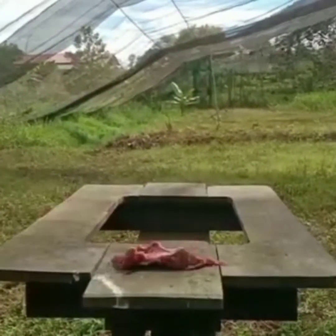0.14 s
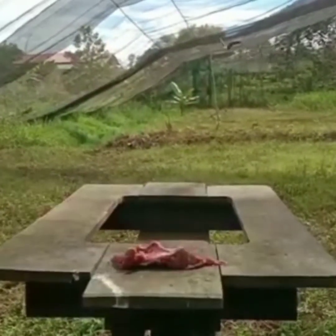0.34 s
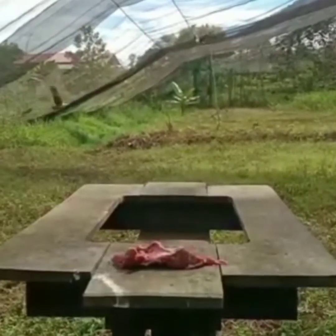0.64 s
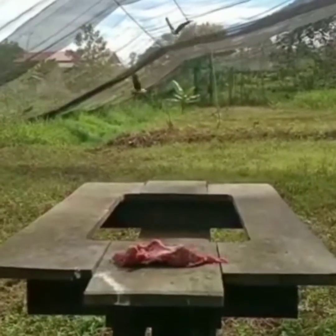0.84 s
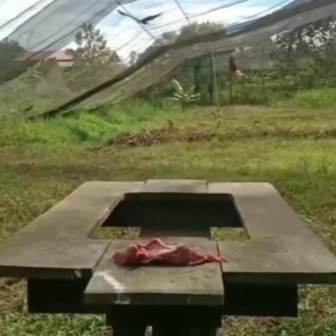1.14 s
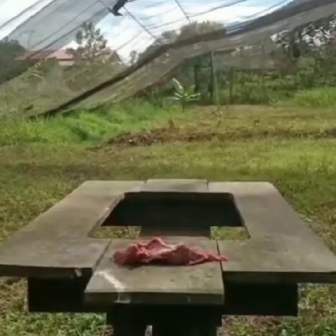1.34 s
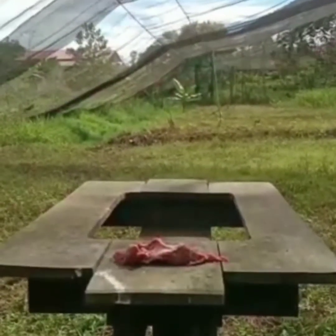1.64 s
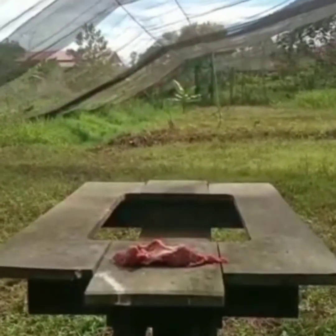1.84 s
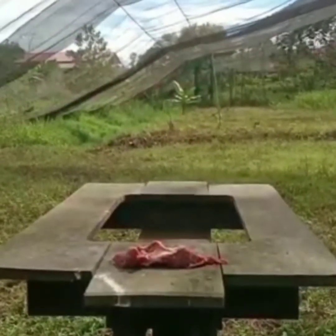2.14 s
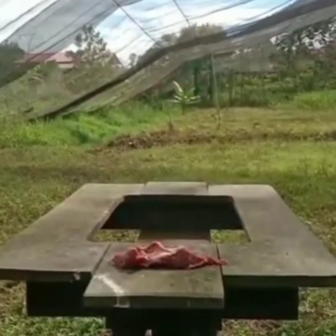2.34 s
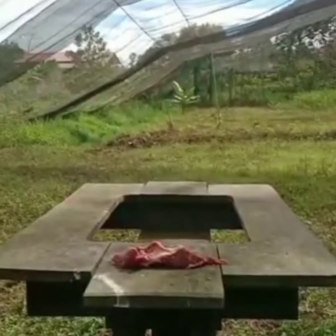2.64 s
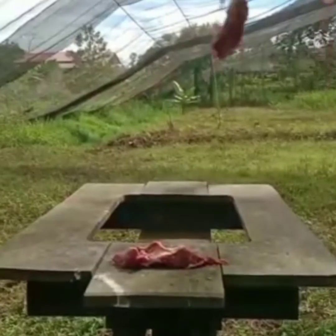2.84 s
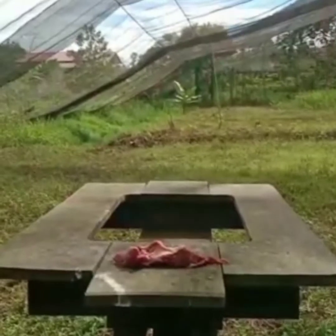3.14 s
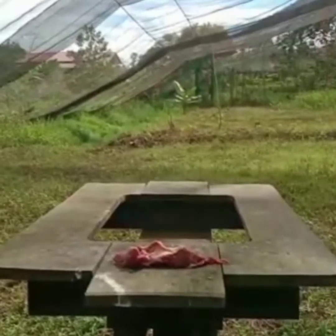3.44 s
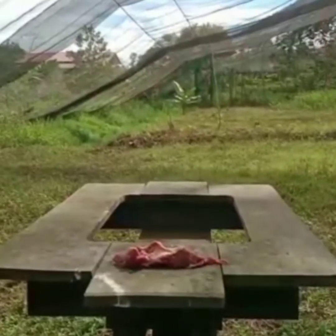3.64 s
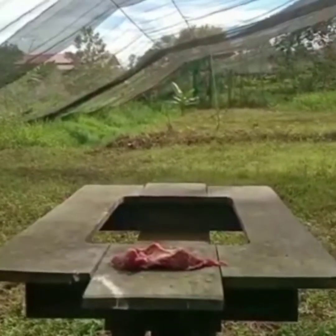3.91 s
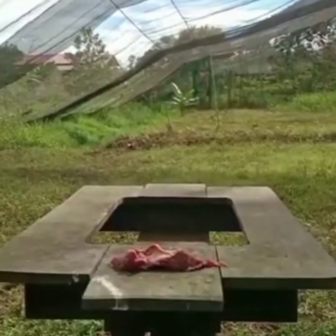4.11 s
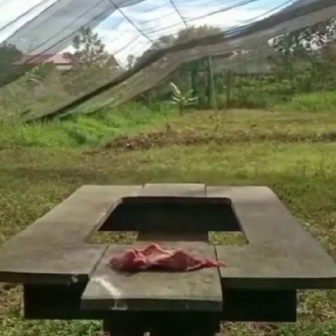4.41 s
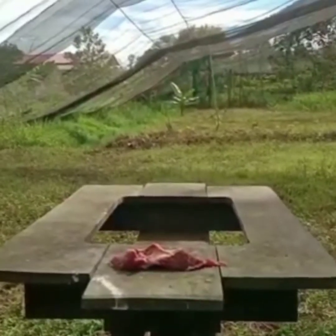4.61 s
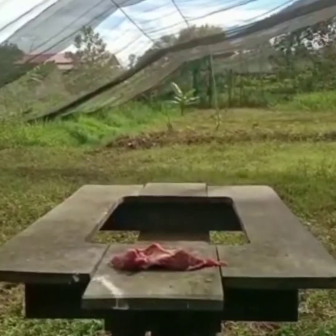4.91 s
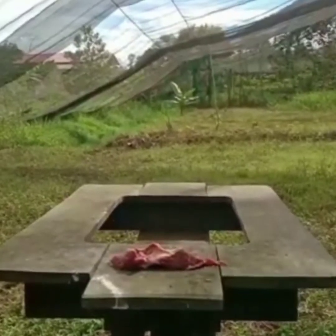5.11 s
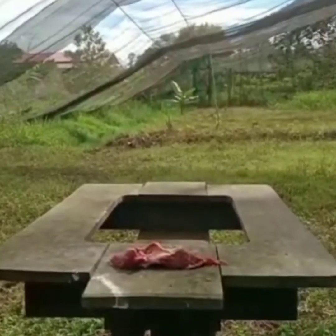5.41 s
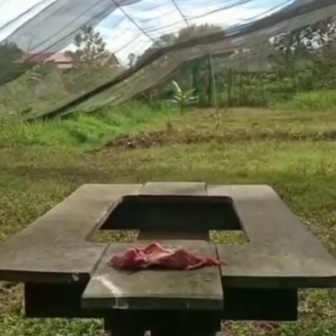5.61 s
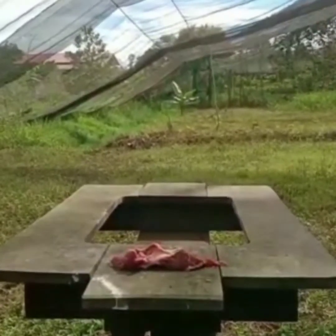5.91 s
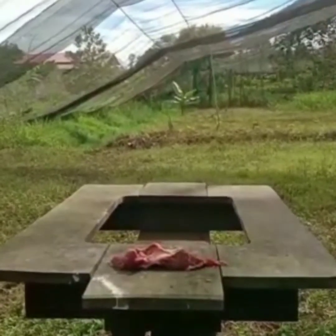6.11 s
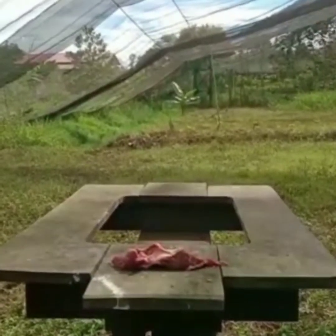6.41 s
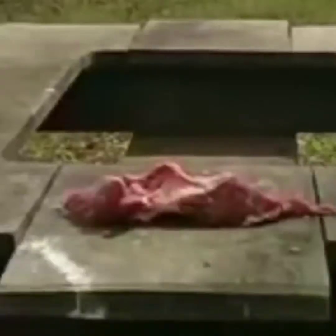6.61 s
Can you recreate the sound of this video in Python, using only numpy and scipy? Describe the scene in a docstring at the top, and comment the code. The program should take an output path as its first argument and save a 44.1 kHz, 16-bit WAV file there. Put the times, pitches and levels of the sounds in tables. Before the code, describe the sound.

Over a low engine-like hum and airy rush, dry rustles and ticks fade away before a bird of prey gives one hoarse, whinnying, descending scream.

```python
"""Hoarse whinny of a bird of prey

A bird of prey in a netted enclosure gives nine quick syllables whose pitch arches and sinks: harmonic pulses
and gated air noise excite resonances, and a decaying noise tail answers. Dry noise rustles and ticks.
An engine hums at multiples of 25 turns a second under a wide rush of coloured noise.
A gain control lowers the whole sound during the scream, ducking the background; near the end the level
drops out and fades back briefly."""
import sys
import numpy as np
from scipy import signal
from scipy.fft import rfft, irfft, next_fast_len
from scipy.io import wavfile
from scipy.ndimage import uniform_filter1d, map_coordinates

SR = 44100
rng = np.random.default_rng(int(sys.argv[2]) if len(sys.argv) > 2 else 0)


def int16_out(signal):
    """Quantize to a 16-bit WAV file."""
    q = np.round(np.clip(np.atleast_2d(signal).T, -1, 1) * 32767)
    wavfile.write(sys.argv[1], SR, q.astype(np.int16))


N = 297675
TOP_HZ = 15600  # upper band limit


def amp(db):
    """Logarithmic level: decibels to amplitude gain."""
    return 10 ** (np.asarray(db) / 20)


def unit(x):
    """Power normalisation: scale to rms 1."""
    return x / np.sqrt(np.mean(x ** 2) + 1e-20)


def along(points, hz):
    """Spectral envelope: interpolate (f/Hz, value) points on a logarithmic frequency axis."""
    f, v = np.transpose(points)
    return np.interp(np.log(hz + 1), np.log(f + 1), v)


def curves(rows):
    """Temporal envelope: one value per sample for each column after the time."""
    times, *columns = np.transpose(rows)
    return [np.interp(np.arange(N) / SR, times, column) for column in columns]


def wobble(rate):
    """Slow random modulation: a smooth curve through `rate` random knots a second."""
    knots = rng.standard_normal(int(N * rate / SR) + 4)
    return map_coordinates(knots, [np.arange(N) * rate / SR])


def filtered(x, response):
    """Linear filtering: multiply the spectrum by a (complex) response."""
    m = next_fast_len(N + SR // 2)
    return irfft(rfft(x, m) * response(np.fft.rfftfreq(m, 1 / SR)), m)[:N]


def resonances(modes):
    """Modal superposition: causal second-order resonances summed with alternating sign."""
    def response(f):
        total = 0
        for k, (centre, width, db) in enumerate(modes):
            mode = 1j * f * width / (centre * centre - f * f + 1j * f * width)
            total = total + (-1) ** k * amp(db) * mode
        return total
    return response


def noise(spectrum, patchy_db):
    """Coloured noise: patches of random gain in time and frequency, then a spectral envelope; rms 1."""
    z = signal.stft(rng.standard_normal(N), nperseg=512)[2]
    field = uniform_filter1d(rng.standard_normal(z.shape), 6, 0)
    field = uniform_filter1d(field, 14, 1)
    patchy = signal.istft(z * amp(patchy_db * unit(field)), nperseg=512)[1][:N]
    return unit(filtered(patchy, lambda hz: amp(along(spectrum, hz))))


# vocal resonances, columns: f/Hz, width/Hz, gain/dB
# throat and beak
THROAT_MODES = [(3173, 507, 11.5), (3596, 373, 15.5), (4740, 250, 6)]
# low tube resonances
CHEST_MODES = [(707, 840, -7.5), (1380, 950, -1.5), (1897, 110, -12.5)]
# resonances heard as the beak opens
BEAK_MODES = [(5530, 520, 3), (7040, 1740, -2.5), (8520, 640, -2.5)]
# air hissing past the beak
BREATH_MODES = [(9400, 2500, -30), (13050, 2000, -24)]


def scream():
    """Source-filter principle: membrane pulses and gated air excite the throat, chest and beak resonances."""
    pitch, level_db, rough, whistle_db, chest_db, beak_db = gesture()
    rough = np.clip(rough, 0, 1)
    jitter = (.009 + .08 * rough) * wobble(800)  # fraction of the pitch
    phase = 2 * np.pi * np.cumsum(pitch * (1 + jitter)) / SR

    flutter = amp(2 * wobble(70))
    pulses = np.zeros(N)
    for k in range(1, 40):
        # each harmonic waxes and wanes on its own time-shifted copy of the flutter
        strength = np.roll(flutter, k * SR // 10)
        pulses += strength * np.cos(k * phase) * (k * pitch < TOP_HZ)
    whistle = amp(whistle_db) * np.cos(4 * phase)  # fourth harmonic, close to the throat resonances
    pulses = (pulses + whistle) * np.sqrt(pitch / SR)  # the same power per Hz at any pitch

    puffs = rng.standard_normal(N) * (1 + np.cos(phase)) ** 2 * 0.3  # air noise gated once a cycle
    effort = amp(level_db + 2 * rough * wobble(200))
    source = effort * (np.sqrt(1 - rough) * pulses + rough * puffs)

    throat = filtered(source, resonances(THROAT_MODES))
    chest = filtered(amp(chest_db) * source, resonances(CHEST_MODES))
    beak = filtered(amp(beak_db) * source, resonances(BEAK_MODES))
    hiss = amp(beak_db) * (0.2 + rough) * 4 * effort * puffs
    breath = filtered(hiss, resonances(BREATH_MODES))
    # soft pulse edges carry little treble: a third-order low-pass
    voiced = filtered(throat + chest - beak, lambda f: 1 / (1 + 1j * f / 9000) ** 3)
    return voiced + breath


# pitch arch of each syllable; the last row ends the call. Columns: start t/s, start f/Hz, top t/s, top f/Hz,
# roundness of the low turn, level/dB, dip at the top/dB, chest gain at the top/dB, beak opening/dB
SYLLABLES = [(5.078, 404, 5.148, 978, .75, -7, -1, 5, 1.5), (5.231, 432, 5.28, 701, 1.8, -5.5, 1.5, -1, 0),
             (5.337, 479.3, 5.376, 850, 1.8, -4.5, 1, -4, 1),
             (5.454, 482.4, 5.493, 881, 1.8, -7, 0, 0, 0.5), (5.562, 388.1, 5.622, 850, 1.5, -7, 4, 5.5, 1),
             (5.68, 400, 5.727, 751, 1.3, -6.5, 5, 7.5, -2),
             (5.783, 359.4, 5.836, 648, 1.5, -4.5, 2, 8, -1.5),
             (5.897, 330.2, 5.94, 538.7, 1.29, -2.5, 1.5, 1, -2),
             (6.01, 291.3, 6.052, 372.3, 1.75, -8, 0, -3, -3.5),
             (6.09, 290, 6.1, 291, 1.83, -9, -2, -8, -3)]
# jumps to a high note; columns: start t/s, end t/s, first f/Hz, last f/Hz,
# starting level/dB, whistle level/dB, chest gain/dB, roughness (0-1)
HIGH_NOTES = [(5.151, 5.203, 981, 915, -5, 2.5, -2.5, 0.25),
              (5.276, 5.321, 879.6, 849, -9.5, 2.5, -2.5, 0.23),
              (5.363, 5.388, 940.3, 987, -5, -2, -12, .1), (5.389, 5.414, 926, 897, -9, 10, -24, .08),
              (5.415, 5.433, 960.5, 887, -5, -8, -10, 0.16),
              (5.479, 5.537, 969.7, 939.4, -3.5, 5, -2.5, 0.17), (5.619, 5.638, 950, 944, -4, -7, -8, 0.09)]
# faltering airflow; columns: deepest t/s, reopening t/s, depth/dB
AIR_BREAKS = [(5.089, 5.099, 11), (5.208, 5.21, 14), (5.676, 5.681, 14), (5.785, 5.794, 10.5),
              (5.889, 5.907, 19.5), (5.991, 6.036, 30), (6.037, 6.04, 7)]
# the call as a whole: onset t/s, close t/s
CALL_SPAN = (5.079, 6.07)
FADE_S, OPEN_S, JUMP_S = 0.013, .005, .004  # sinking into a break, coming out of it, snapping to a new note
CHEST_LOW_DB, CHEST_NARROW = -2, 3.3  # chest gain at the low turns, narrowness of the change at the top
SAG_DB, NOTE_SAG_DB_PER_S = 1.5, 65  # effort ebbs per half arch and through a high note
BEAK_DB_PER_OCTAVE = 5.5  # the beak opens wider for higher notes
FREE_WHISTLE_DB, FREE_ROUGH = -17.5, .1  # outside the high notes
WHISTLE_HZ, WHISTLE_GAIN_DB = 810, 16  # around this pitch the whistle sets in by itself


def gesture():
    """Motor control of phonation: pitch, level, roughness, whistle, chest and beak through the call."""
    t = np.arange(N) / SR
    start, low_hz, top, top_hz, roundness, level_db, dip_db, chest_db, beak_db = np.transpose(SYLLABLES)
    turns = np.ravel([start, top], order='F')
    k = np.clip(np.searchsorted(turns, t) - 1, 0, len(turns) - 2)
    foot, crest = (k + 1) // 2, k // 2  # the adjoining low turn and top
    climb = np.clip((t - start[foot]) / (top[crest] - start[foot]), 0, 1)
    height = np.sin(np.pi / 2 * climb) ** roundness[foot]
    near_top = height ** CHEST_NARROW
    ebb_db = SAG_DB * np.where(foot > crest, 2 - climb, climb)

    arch_hz = low_hz[foot] + (top_hz[crest] - low_hz[foot]) * height
    arch_db = level_db[crest] - dip_db[crest] * near_top - ebb_db
    onset = 1 / (1 + np.exp((WHISTLE_HZ - arch_hz) / 40))
    whistle_db = FREE_WHISTLE_DB + WHISTLE_GAIN_DB * onset
    arch_chest_db = CHEST_LOW_DB + (chest_db[crest] - CHEST_LOW_DB) * near_top
    voice = np.array([arch_hz, arch_db, whistle_db, arch_chest_db, FREE_ROUGH + 0 * t])

    for s0, s1, first_hz, last_hz, *held in HIGH_NOTES:
        on = (t >= s0) & (t < s1)
        voice[0, on] = np.interp(t[on], [s0, s1], [first_hz, last_hz])
        voice[1:, on] = np.array(held)[:, None]
        voice[1, on] -= NOTE_SAG_DB_PER_S * (t[on] - s0)
    pitch, level_db, whistle_db, chest_db, rough = uniform_filter1d(voice, round(JUMP_S * SR), axis=1)

    for s0, s1, depth_db in AIR_BREAKS:
        level_db = level_db - depth_db * np.interp(t, [s0 - FADE_S, s0, s1, s1 + OPEN_S], [0, 1, 1, 0])
    begin, close = CALL_SPAN
    level_db = level_db - 80 * np.interp(t, [begin - .002, begin + .002], [1, 0])
    level_db = level_db - 25 * np.clip((t - close) / FADE_S + 1, 0, 9) ** 2
    opening_db = np.interp(t, top, beak_db) + BEAK_DB_PER_OCTAVE * np.log2(pitch / 600)
    return pitch, level_db, rough, whistle_db, chest_db, opening_db


# reverberation of the enclosure; columns: f/Hz, 60 dB decay time t/s
DECAY_TIMES = [(400, 0.1), (3500, 0.11), (12000, 0.013)]


def echo(x):
    """Reverberation: convolution with a noise tail whose decay time depends on frequency."""
    hz, t, z = signal.stft(rng.standard_normal(SR // 4), SR, nperseg=256)
    decay_db = -60 * t / along(DECAY_TIMES, hz)[:, None]
    tail = signal.istft(z * amp(decay_db), SR, nperseg=256)[1]
    delayed = np.pad(x, (200, 0))  # samples
    return signal.fftconvolve(delayed, tail / np.linalg.norm(tail))[:N]


# spells of dry rustle; columns: middle t/s, half length t/s, level/dB before the high-pass
RUSTLE_SPELLS = [(0.085, 0.035, -51), (0.179, 0.043, -34.5), (0.29, 0.058, -50), (0.4, .02, -54),
                 (.465, .025, -61), (0.605, 0.021, -39), (0.868, 0.02, -33.5), (.97, 0.09, -45.5),
                 (1.125, 0.068, -56), (1.248, 0.022, -51), (1.465, 0.057, -42), (1.558, 0.023, -46),
                 (1.823, 0.025, -55), (2.265, .025, -54), (2.482, .035, -55), (2.62, 0.035, -51.5),
                 (2.717, 0.046, -41.5), (2.83, .03, -55), (2.94, 0.042, -52.5), (3.113, 0.025, -52),
                 (3.234, 0.061, -48), (3.57, 0.034, -49.5), (3.733, .03, -52), (3.95, 0.1, -56),
                 (4.8, 0.029, -50)]
# colour of the dry material; columns: f/Hz, relative level/dB
DRY_SPECTRUM = [(1760, 5.5), (3000, -10), (3870, 1.5), (5760, 0), (6660, -8), (7690, -5.5), (8700, -14.5),
                (10600, -12.5), (11700, -14), (14600, -8), (15500, -26)]
# the sharpest ticks; columns: t/s, starting level/dB before colouring
TICK_EVENTS = [(0.1364, -28), (0.1426, -23), (0.1684, -27.5), (0.2558, -30), (0.2967, -33.5), (0.39, -34),
               (0.4509, -35), (0.4753, -33), (0.5641, -29), (0.5881, -27), (0.85, -29), (0.8611, -19.5),
               (0.9188, -32.5), (0.9537, -32), (1.0101, -29.5), (1.1044, -33), (1.2241, -41), (1.3862, -36),
               (1.5055, -32), (1.6975, -38), (1.8028, -32), (2.6219, -34), (2.6848, -31), (3.1193, -35.5),
               (3.5354, -32.5), (3.5982, -32), (3.713, -34.5), (3.7564, -36), (3.9439, -38),
               (4.1066, -35.5)]
# duller scrapes; columns: t/s, starting level/dB before the resonances
SCRAPE_EVENTS = [(3.2096, -24.5), (3.2164, -24), (3.228, -28), (3.249, -24.5)]
# resonances of the scrapes; columns: f/Hz, width/Hz, gain/dB
SCRAPE_MODES = [(1870, 770, 4.0), (3580, 450, 1), (4370, 660, -0.5), (8900, 5500, -26)]


def rustle():
    """Granular friction noise: random snaps gate a coloured noise in spells, with ticks and scrapes on top."""
    t = np.arange(N) / SR
    spells = sum(amp(db) * np.exp(-np.abs((t - s) / half) ** 3) for s, half, db in RUSTLE_SPELLS)
    trickle = amp(-58.5 - 3.7 * t + 5.5 * wobble(8.65))  # faint, fading
    snaps = (rng.random(N) < 180 / SR) * amp(6.8 * rng.standard_normal(N))  # 180 a second on average
    # each grain starts sharply and dies by 60 dB in 8.6 ms
    grain = 0.5 + signal.lfilter([1], [1, -amp(-60 / (0.0086 * SR))], snaps)
    crackle = unit(noise(DRY_SPECTRUM, patchy_db=1.5) * grain)
    ticks = filtered(bursts(TICK_EVENTS, t60=0.029), lambda hz: amp(along(DRY_SPECTRUM, hz)))
    scrapes = filtered(bursts(SCRAPE_EVENTS, t60=0.048), resonances(SCRAPE_MODES))
    bright = filtered((spells + trickle) * crackle + ticks, lambda hz: hz > 2200)
    return bright + scrapes


def bursts(events, t60):
    """Exponential decay: a short dying puff of noise at each event."""
    out, t = np.zeros(N), np.arange(SR // 30) / SR
    for s, db in events:
        out[round(s * SR):][:len(t)] += amp(db - 60 * t / t60) * rng.standard_normal(len(t))
    return out


# engine harmonics; columns: multiple of the turning rate, rms level/dB, waver/dB
ENGINE_ORDERS = [(3, -43.5, 1.2), (4, -55, 2.5), (5, -56, 2.5), (6, -43.5, 1.5), (30, -56, 3)]
# occasional swells of orders nine to eleven; columns: middle t/s, half length t/s, level/dB
ORDER_SWELLS = [(.1, .3, -46), (.82, 0.15, -48.5), (2.8, 0.33, -58), (3.752, 0.13, -46.5),
                (4.417, 0.19, -47), (5.051, 0.15, -46)]
TURN_HZ, SWELL_REST_DB = 25.02, -65.5


def engine():
    """Harmonic series of rotation: sines at multiples of a slightly unsteady turning rate."""
    turn = 2 * np.pi * np.cumsum(TURN_HZ * (1 + .004 * wobble(3.3))) / SR
    hum = np.zeros(N)
    for k, db, waver in ENGINE_ORDERS:
        hum += amp(db + waver * wobble(8)) * np.sin(k * turn + 2 * np.pi * rng.random())
    swell = sum(amp(db + 4 * wobble(9)) * np.sin(k * turn) for k, db in [(9, -8), (10, -2), (11, -9)])
    t = np.arange(N) / SR
    level = amp(SWELL_REST_DB) + sum(amp(db) * np.exp(-((t - s) / half) ** 2) for s, half, db in ORDER_SWELLS)
    return np.sqrt(2) * (hum + level * swell)  # peak of a sine from its rms


# noise levels; columns: t/s, body level/dB, hiss level/dB
RUSH_LEVELS = [(0, -37.5, -49), (.8, -38, -50), (1.8, -38.5, -50.5), (3, -40.5, -51.5), (4.3, -40.5, -54.5),
               (4.9, -38, -53), (6.1, -38, -51), (6.75, -39.5, -54)]
# colours of the two noises; columns: f/Hz, relative level/dB
BODY_SPECTRUM = [(15, -55), (45, -16.5), (65, -17.5), (120, -8), (200, -14.5), (270, -20.5), (400, -34.5),
                 (540, -15.5), (720, -9), (900, -15), (1250, -8.5), (1750, -16.5), (2100, -22),
                 (2450, -30.5), (3000, -97)]
HISS_SPECTRUM = [(2000, -47), (2500, -8), (3300, 7), (4200, -5.5), (5000, -16.5), (6500, -10), (8000, -9),
                 (9000, -29), (11000, -98), (16000, -77)]


def rush():
    """Broadband noise of engine and air: a low body and a high hiss share one slow drift."""
    body_db, hiss_db = curves(RUSH_LEVELS)
    drift_db = .5 * wobble(4.39)
    body = amp(body_db + drift_db) * noise(BODY_SPECTRUM, patchy_db=1.5)
    hiss = amp(hiss_db + drift_db) * noise(HISS_SPECTRUM, patchy_db=2.5)
    return body + hiss


def scene():
    """Superposition: bird, enclosure and background add linearly."""
    bird = scream()
    answer = amp(-14) * echo(bird)
    return (bird + answer + rustle() + engine() + rush())[None]


# brief dropout of the level, which then fades back: start t/s, length t/s
DROPOUT = (6.482, .015)
# bands that the microphone housing swallows; columns: f/Hz, width/Hz, share/dB
HOUSING_BANDS = [(2380, 450, -1.5), (11400, 1900, -1)]


def record(dry):
    """Dynamic compression: gain falls above a threshold; notches and a band limit then shape the spectrum."""
    power = uniform_filter1d(dry[0] ** 2, size=6000, origin=2900)  # mean over almost only past samples
    loud_db = 10 * np.log10(np.abs(power) + 1e-12)
    gain = amp(-.25 * np.clip(loud_db + 29, 0, None))  # a quarter dB less per dB above -29 dB
    start, length = DROPOUT
    since = np.arange(N) / SR - start
    gain = gain * np.where(since < 0, 1, np.clip(since / length, 0, 1))

    def housing(hz):
        """Absorption: each band loses its share, and nothing passes above the band limit."""
        return np.prod([1 - resonances([band])(hz) for band in HOUSING_BANDS], axis=0) * (hz < TOP_HZ)
    return filtered(gain * dry[0], housing)[None]


dry = scene()
out = record(dry)
int16_out(out)
```